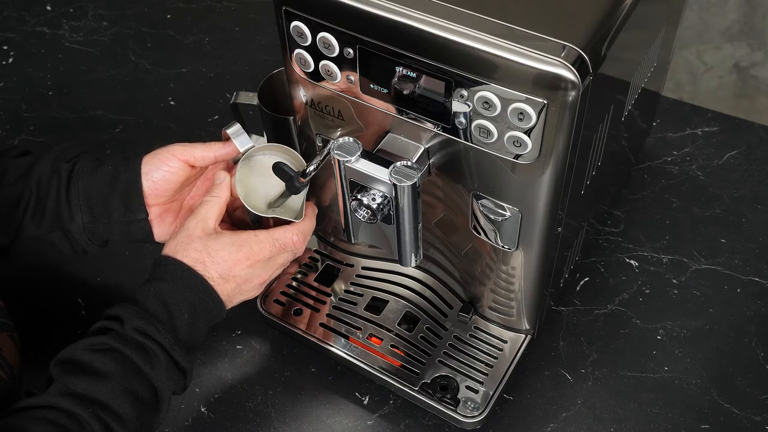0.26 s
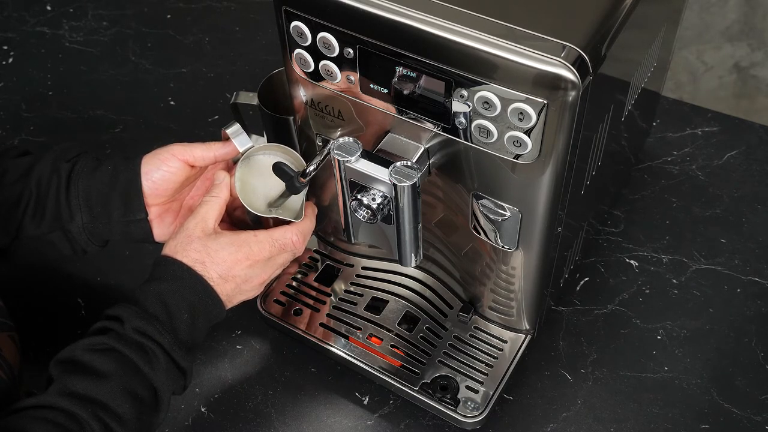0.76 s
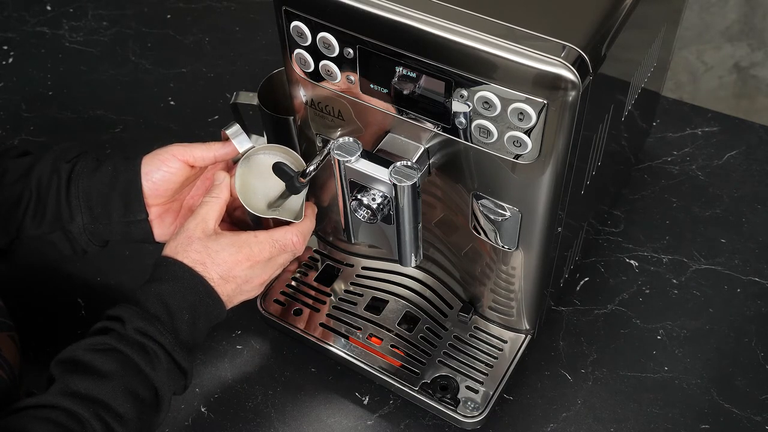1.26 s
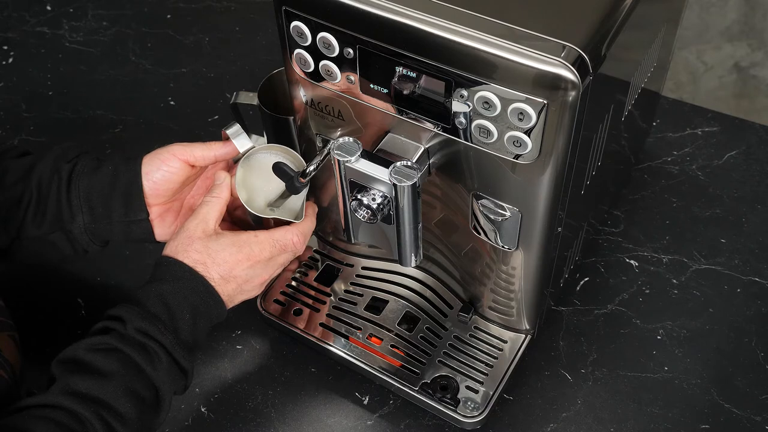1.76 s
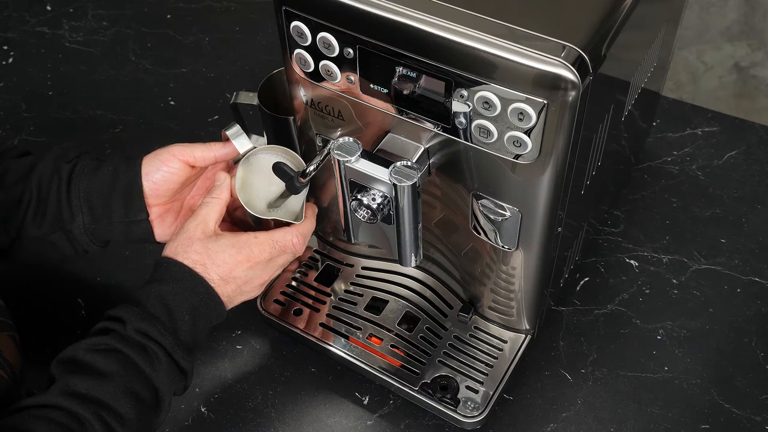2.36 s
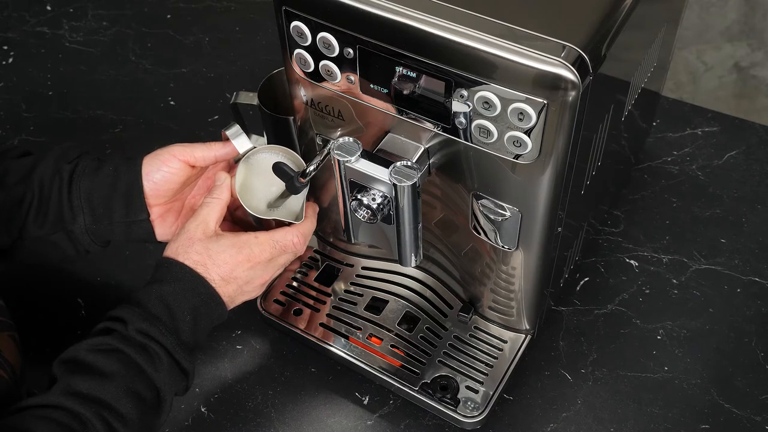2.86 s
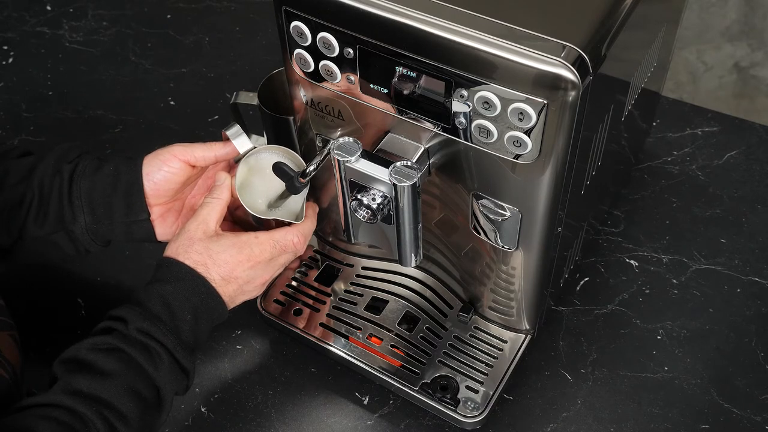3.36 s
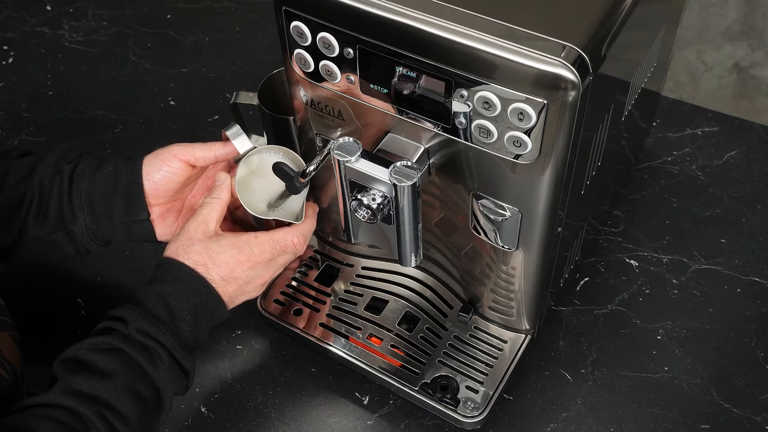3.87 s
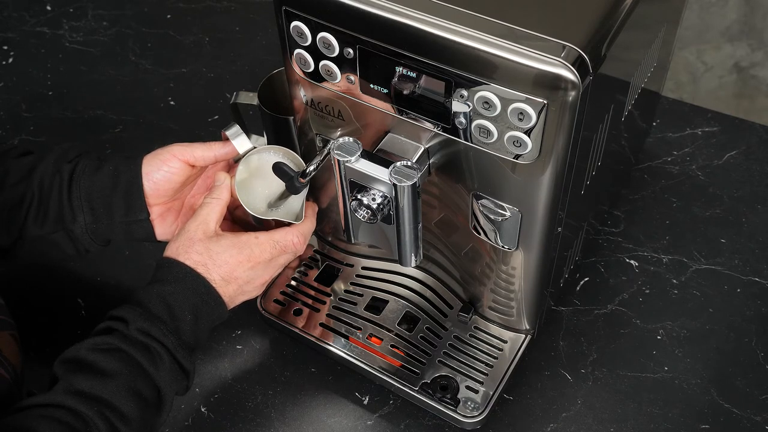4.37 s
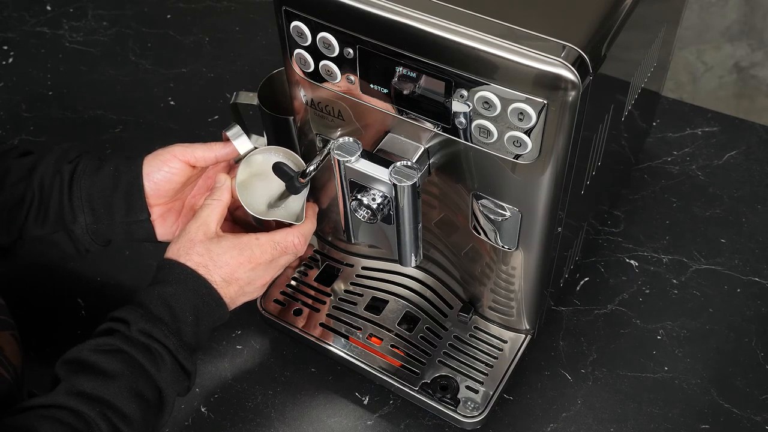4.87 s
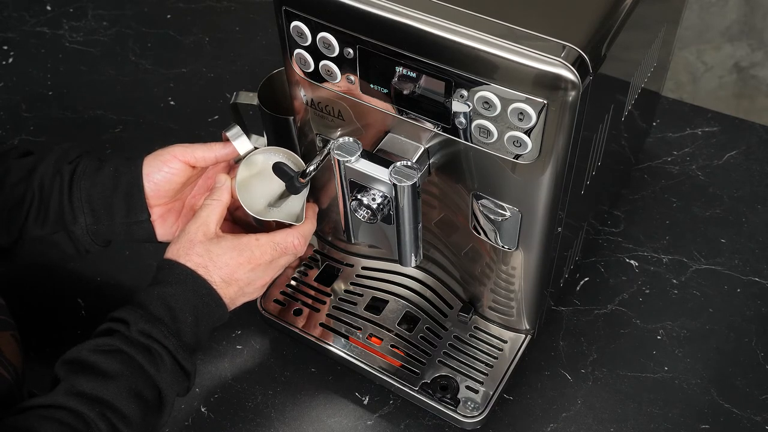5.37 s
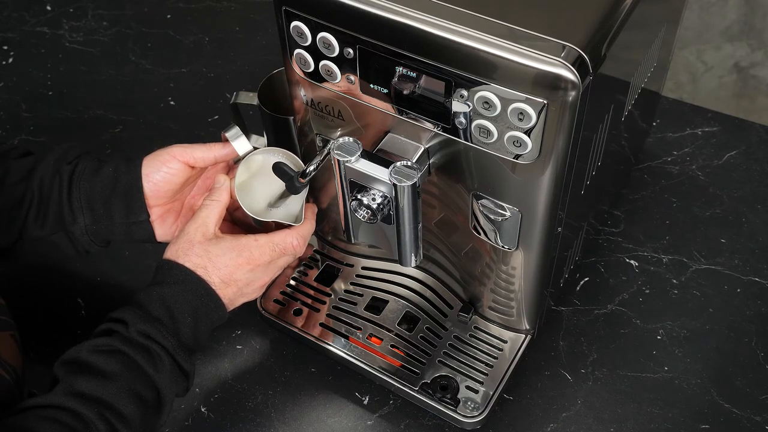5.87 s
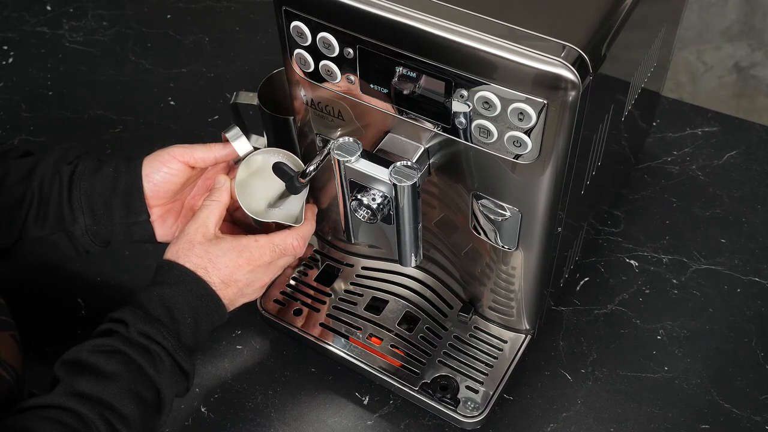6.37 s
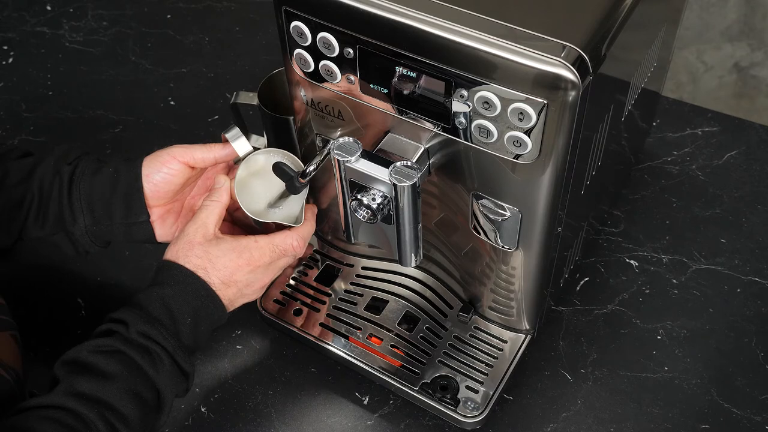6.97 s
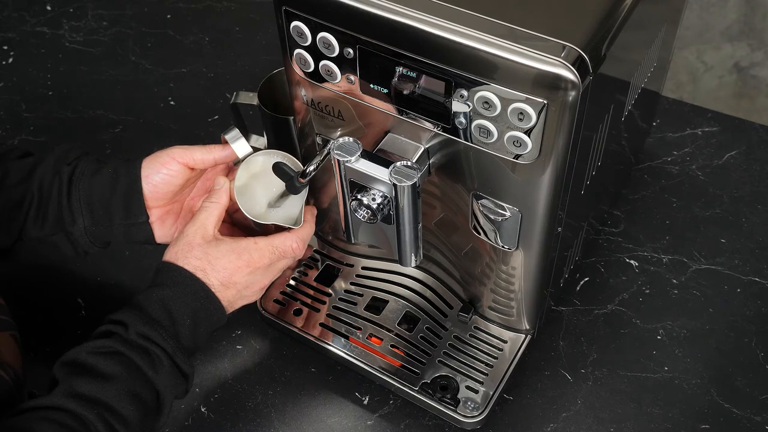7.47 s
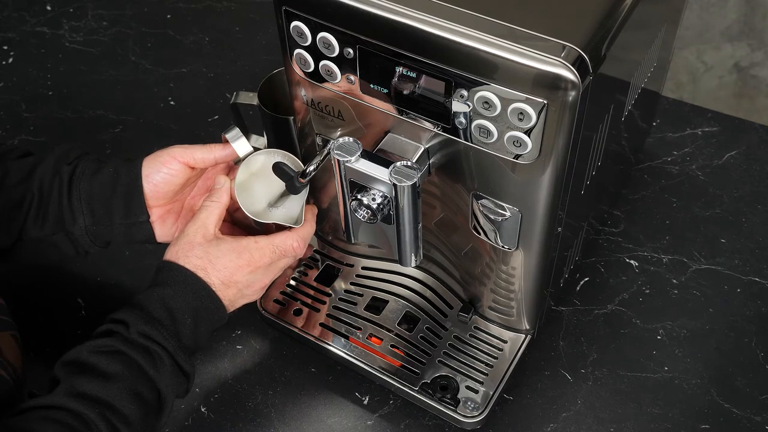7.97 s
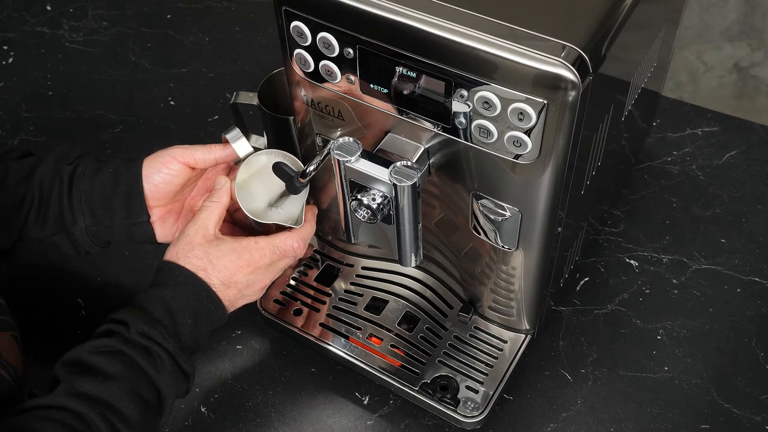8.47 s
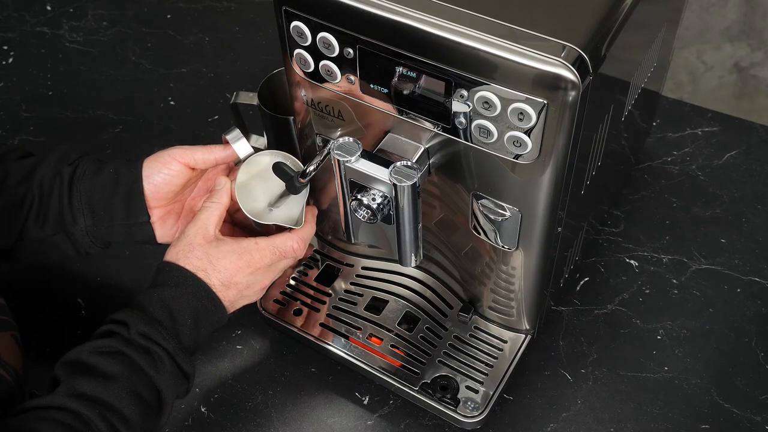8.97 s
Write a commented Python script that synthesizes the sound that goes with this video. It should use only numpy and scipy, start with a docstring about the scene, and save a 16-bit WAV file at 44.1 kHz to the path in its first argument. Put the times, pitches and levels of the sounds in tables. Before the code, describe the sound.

From 0 to about 9.2 seconds, close to the microphone in a quiet room, an even, bright steam hiss runs without pause. Under it, milk churns with a hollow, fluttering roar around 1 kHz in a small steel pitcher, and condensing bubbles rasp with a ringing crackle. Two spitting snaps come just after 0.1, with big-bubble bloops near 0.5 and 0.7. At 1.4-1.75 the tip breaks the surface in the strongest, shrill sputter, and the rasp thins. Further spurts follow near 2.3, with short sputters around 3.0-3.6 and a few bloops near 4.0-4.3. From 4.4 brief lower gurgles alternate with weaker sputters, while the remaining rasp becomes thinner and higher. Low puffs of escaping air rumble softly. After 8.3 a fine, high fizz of tiny pops rises, churning swells and the rasp fades. Throughout, a faint dull pump throbs roughly five times a second.

```python
"""Steam wand frothing milk

A coffee machine's steam wand froths milk in a small steel pitcher, close to the microphone. The jet is hissing
noise; collapsing bubbles are noise puffs that churn in the pitcher's hollow and rasp while the tip is deep.
When the tip breaks the surface, clumped puffs sputter and the rasp thins out. From about the middle, as foam
builds, the tip dips in for short gurgles; near the end a fizz of tiny pops joins. A pump of decaying sine
tones throbs almost evenly behind."""
import sys
import numpy as np
from scipy import signal
from scipy.fft import rfft, irfft, next_fast_len
from scipy.io import wavfile
from scipy.ndimage import uniform_filter1d, map_coordinates

SR = 44100
rng = np.random.default_rng(int(sys.argv[2]) if len(sys.argv) > 2 else 0)


def wrap_up_sound(samples):
    """Save the sound to the file named by the first command line argument, as 16-bit audio."""
    columns = np.atleast_2d(samples).T
    # keep every value between -1 and 1, then stretch to whole-number steps
    tamed = np.clip(columns, -1, 1)
    steps = np.round(tamed * 32767).astype(np.int16)
    wavfile.write(sys.argv[1], SR, steps)


N = 406602  # length in samples

# Quiet room and low air noise, relative spectra: (frequency [Hz], density [dB per Hz])
ROOM_TONE = [(20, 3.5), (100, -0.5), (160, -18.5), (350, -11), (600, -15.5), (2000, -12.5), (16000, -48)]
RUMBLE = [(10, -10), (24, 3), (45, -5.5), (92, -22), (160, -34), (300, -43)]
# Ringing of the pump's housing: (frequency [Hz], average relative level [dB], time to fall 60 dB [s])
HOUSING = [(206, -0.5, 0.18), (226.7, -5, 0.19), (259.2, -3.5, 0.22), (309, -3.5, 0.17), (365, 1.5, 0.11),
           (413.5, 3.5, 0.11), (493, -1.5, 0.2)]
# Steam hiss before the nozzle resonances, relative spectrum: (frequency [Hz], density [dB per Hz])
HISS = [(300, -46), (1500, -4), (3300, -0.5), (3950, 3.5), (4400, 2.5), (4650, 2), (5300, -3), (6900, 1.5),
        (8100, 3.5), (9200, 0.5), (10000, 4), (11600, 1.5), (12500, -22), (13400, -28), (15800, -19)]
# Resonances of the nozzle: (frequency [Hz], width [Hz], boost [dB])
NOZZLE = [(5610, 84, 10.5), (6390, 120, 8), (7480, 170, 11), (8220, 140, 8.5), (8740, 150, 7.5)]
# Fine fizz of the foam near the end: (time [s], level [dB])
FIZZ = [(8.3, -75), (8.55, -39), (9.22, -35.5)]
# Colour of the fizz, relative spectrum: (frequency [Hz], density [dB per Hz])
FOAM_FIZZ = [(4500, -54), (5300, -4), (5630, 2), (6000, -14), (8900, -35), (9600, -17), (12500, -7),
             (13600, -4), (14250, -21), (15600, 0)]
# Foam builds up: (time [s], share [0-1])
FOAM = [(0, 0), (5, 0.17), (7.3, 1), (9.22, 0.88)]
# The pitcher tilts and flattens the hollow's note: (time [s], share [0-1])
TILT = [(1.6, 0.07), (1.8, 0.93), (2.95, 0.94), (3.3, 0.12), (3.6, 0), (5.1, 0.1), (5.25, 0.87),
        (6.2, 0.62), (6.8, 0.33), (7.3, 0)]
# Churning milk, before its random flutter: (time [s], level [dB])
CHURN = [(0, -33), (.3, -33), (.73, -29.5), (1.2, -32.5), (1.7, -37), (1.85, -32.5), (3.5, -33.5),
         (4.9, -33.5), (5.02, -29.5), (5.15, -33.5), (6.4, -33.5), (7.45, -31.5), (7.75, -34), (8.4, -32),
         (9.22, -28.5)]
# The hollow with cold milk, warm milk and the pitcher tilted, relative spectra: (frequency [Hz], density [dB
# per Hz])
COLD_HOLLOW = [(350, -31), (480, -25.5), (590, -18), (700, -19.5), (815, -5.5), (950, 3), (1050, -3),
               (1180, -9.5), (1370, -4.5), (1460, -11.5), (1570, -29), (2000, -34.5)]
WARM_HOLLOW = [(350, -27.5), (470, -17), (570, -24.5), (740, -11.5), (860, -12.5), (1015, 3.5),
               (1200, -7.5), (1300, -5.5), (1430, -8), (1580, -27.5), (1710, -17), (2050, -41)]
TILTED_HOLLOW = [(350, -27), (480, -19), (610, -15.5), (720, -9), (820, 0.5), (920, -2), (1050, 1.5),
                 (1210, 2), (1340, -6), (1450, -9), (1580, -19.5), (2000, -36)]
# Big bubbles collapse: (time [s], peak of the swell [dB])
GULPS = [(.473, -16), (.668, -20), (1.826, -19.5), (2.761, -20), (3.907, -29), (4.012, -19), (4.317, -17.5),
         (5.926, -24), (7.738, -24), (8.15, -25.5)]
# Single spurts of spray: (time [s], strength that sets snap, thud and gust [dB])
SPURTS = [(.1033, -7.5), (0.1423, -11), (1.037, -16.5), (1.4358, -8), (1.566, -8), (2.215, -12.5),
          (2.3046, -8.5), (3.3338, -17), (3.3737, -20), (3.3915, -15), (4.242, -21), (4.81, -18.5),
          (5.8955, -15.5), (6.327, -20.5), (7.0675, -19), (8.228, -18)]
# Low thud of a spurt, relative spectrum: (frequency [Hz], density [dB per Hz])
THUD = [(20, 0), (70, -5), (150, -9), (400, -12), (700, -18), (1500, -40)]
# Hard and soft spray, relative spectra: (frequency [Hz], density [dB per Hz])
HARD_SPRAY = [(500, -20.5), (2000, -25), (4000, -18.5), (5300, -26.5), (7600, -16.5), (9150, -16.5),
              (9600, -10.5), (10400, -1.5), (10950, -9), (11500, 2), (12400, -6.5), (13000, -16),
              (13500, -9.5), (14300, -19), (15600, -10.5)]
SOFT_SPRAY = [(1500, -21), (5000, -37), (7000, -5), (9000, -8.5), (9700, 7.5), (10900, 5.5), (12000, 4.5),
              (13000, -1), (13500, -9), (14300, -4), (15600, -15)]
# The tip breaks the surface and sputters: (start [s], length [s], starting level [dB])
SPUTTERS = [(1.429, 0.32, -19), (2.314, .075, -26.5), (3.045, 0.092, -22), (3.178, 0.084, -24),
            (3.442, 0.014, -31), (3.555, 0.014, -24.5), (4.603, .045, -27.5), (4.998, 0.061, -33.5),
            (5.496, .1, -29), (6.106, .03, -26), (6.65, 0.073, -30.5), (6.853, 0.083, -24.5),
            (7.145, 0.071, -27.5), (7.39, 0.11, -40), (7.85, .06, -39.5)]
# Light spitting around the tip between the sputters: (time [s], level [dB])
SPITTING = [(0, -43), (.6, -52), (1.3, -41), (1.85, -54), (2.1, -42.5), (2.8, -48), (3.4, -33.5),
            (3.7, -47.5), (3.95, -41.5), (4.9, -39), (5.4, -45.5), (5.7, -37), (6.0, -43.5), (6.55, -38),
            (7.3, -45), (8.05, -48.5), (8.6, -39.5), (9.22, -35)]
# Steam condenses under the milk, before venting, gurgles and slosh: (time [s], level [dB], bubble ring [Hz])
RASP = [(0, -34.5, 2520), (.42, -32, 2420), (.6, -33.5, 2270), (1.02, -34, 2040), (1.2, -33, 2500),
        (1.9, -31.5, 2550), (2.15, -36.5, 2520), (2.92, -33.5, 2550), (3.3, -39, 2825), (3.68, -34.5, 2680),
        (3.95, -39, 2610), (4.15, -35.5, 2620), (4.38, -40, 3155), (5.0, -45, 3410), (5.7, -40.5, 3500),
        (6.6, -42.5, 3830), (8.3, -40, 3840), (9.22, -57, 3750)]
# The tip dips in and gurgles, before slosh: (start [s], length [s], level [dB], bubble ring [Hz])
GURGLES = [(4.433, 0.094, -37.5, 2750), (4.674, 0.12, -42, 2740), (5.25, 0.22, -36.5, 2800),
           (5.976, 0.094, -37.5, 2500), (6.202, 0.2, -37, 2500), (6.51, .05, -40.5, 2680),
           (6.79, .025, -38.5, 2950), (6.974, 0.053, -39, 2550), (7.345, .02, -36, 2620),
           (7.535, 0.033, -37.5, 2600), (8.004, 0.16, -36.5, 2910), (8.43, .015, -39, 2950),
           (8.809, .01, -39, 3150)]
# Air modes of the pitcher, before they are sharpened: (frequency [Hz], width [Hz], relative level [dB])
PITCHER = [(1676, 174, 6.5), (1887, 85, 5.5), (2098, 39, 5), (2136, 45, 7.5), (2234, 30, 5.5),
           (2390, 47, 6), (2458, 53, 5.5), (2680, 145, 6.5), (2816, 22, 6.5), (2965, 45, -7.5),
           (3076, 65, 7.5), (3156, 44, 4), (3380, 45, 5.5), (3720, 110, -0.5), (3920, 175, 5),
           (4136, 370, 5.5)]

JET_DB = -38
SPUTTER_ATTACK_S, SPUTTER_RELEASE_S, SPUTTER_SAG_DB_PER_S = 0.035, 0.013, 12
GURGLE_ATTACK_S, GURGLE_RELEASE_S = 0.057, 0.034
# The thin rasp left while steam escapes, and the sputter level that lets half of the steam out
VENTED_DB, VENTED_HZ, VENTING_DB = -45.5, 3730, -28.5
VENTING_SMOOTH_S = 0.02  # time the rasp takes to thin out or return
# Thud strength of the strongest spurt; weaker spurts lose their thud faster than their snap
THUD_DB, THUD_GROWS = -30, 1.6
SPURT_GUST_DB, SPURT_GUST_T60_S = -29, 0.3  # draught after a spurt, relative to the spurt
TOP_HZ = 15830


def amp(db):
    """Turn decibels into gain."""
    return 10 ** (np.asarray(db) / 20)


def unit(x):
    """Scale x to an average strength (rms) of 1."""
    return x / np.sqrt(np.mean(x ** 2) + 1e-20)


def seconds():
    """Give the time of every sample."""
    return np.arange(N) / SR


def curve(rows):
    """Join (time, value) rows with straight lines, one value per sample."""
    return np.interp(seconds(), *np.transpose(rows))


def shape(points):
    """Make a gain for any frequency from (Hz, dB) points, joined along a log axis."""
    f, db = np.transpose(points)
    return lambda hz: amp(np.interp(np.log(hz + 1), np.log(f + 1), db))


def humps(modes, hz):
    """Join the gains of (Hz, width, dB) resonances by adding their power."""
    power = sum(
        amp(db) ** 2 / (1 + (2 * (hz - centre) / width) ** 2)
        for centre, width, db in modes)
    return np.sqrt(power)


def wobble(rate):
    """Draw a smooth random curve with this many random points a second."""
    coarse = seconds()[::64]
    points = rng.standard_normal(len(coarse))
    return np.interp(seconds(), coarse, map_coordinates(points, [coarse * rate]))


def coloured(x, gain, size=16384):
    """Filter x to this gain against frequency, without any sound ahead of its cause."""
    wanted = np.maximum(gain(np.fft.rfftfreq(size, 1 / SR)), 1e-6)
    # folding the cepstrum puts the filter's energy as early as possible
    cepstrum = irfft(np.log(wanted))
    cepstrum[1:size // 2] *= 2
    cepstrum[size // 2 + 1:] = 0
    response = irfft(np.exp(rfft(cepstrum)))[:size // 2]
    return signal.oaconvolve(x, response)[:N]


def impulses(times, sizes):
    """Place kicks of these sizes at these times."""
    places = np.clip(np.asarray(times) * SR, 0, N - 1).astype(int)
    return np.bincount(places, sizes, N)


def pops(rate, spread_db, count=60000):
    """Scatter kicks of uneven size at random times, rate a second."""
    times = rng.random(count) * N / SR
    sizes = amp(spread_db * np.clip(rng.standard_normal(count), -2, 2))
    used = int(rate * N / SR)
    return impulses(times[:used], sizes[:used])


def fading_power(kicks, t60):
    """Let the power of every kick die away, 60 dB in t60 seconds."""
    return signal.lfilter([1], [1, -amp(-120 / (t60 * SR))], kicks ** 2)


def puffs(kicks, t60, rise=0.00049):
    """Let every kick release a short, fading puff of noise with a soft start; times in seconds."""
    power = fading_power(kicks, t60)
    power = signal.lfilter([1 / (rise * SR)], [1, -np.exp(-1 / (rise * SR))], power)
    return np.sqrt(power) * rng.standard_normal(N)


def event_gain(start, length, attack, release, sag_db_per_s=0):
    """Fade one event in ahead of its start, hold it while it sags, then fade it out; times in seconds."""
    t = seconds() - start
    gate = np.interp(t, [-attack, 0, length, length + release], [0, 1, 1, 0])
    return gate * amp(-sag_db_per_s * np.clip(t, 0, length))


def air(spit, rest_db=-56, gust_db=-39.0, gust_grows=0.57, foam_db=4):
    """Steam that escapes the milk puffs on the microphone, more as foam builds, over a quiet room."""
    loudest_sputter_db = np.max(SPUTTERS, axis=0)[2]
    escaping = gust_grows * (spit - loudest_sputter_db) + foam_db * curve(FOAM)
    s, db = np.transpose(SPURTS)
    gust_power = fading_power(impulses(s, amp(db + SPURT_GUST_DB)), SPURT_GUST_T60_S)
    draught = np.sqrt(amp(rest_db) ** 2 + amp(gust_db + escaping) ** 2 + gust_power)
    rumble = unit(coloured(rng.standard_normal(N), shape(RUMBLE)))
    rumble = rumble * draught * amp(2.5 * wobble(12))
    room = unit(coloured(rng.standard_normal(N), shape(ROOM_TONE))) * amp(-58.5)
    return rumble + room


def pump(first=0.118, period=0.183, swell=0.045, scatter=0.00278):
    """Each soft stroke of the water pump swells and rings in the machine's housing; settings in seconds."""
    out = np.zeros(N + SR)
    t = np.arange(SR // 3) / SR
    for s in np.arange(first, N / SR, period):
        ring = np.zeros(len(t))
        for hz, db, t60 in HOUSING:
            fade = amp(db + rng.normal(0, 2.4) - 60 * t / t60)
            ring += fade * np.sin(2 * np.pi * (hz * t + rng.random()))
        begin = round(abs(s + rng.normal(0, scatter)) * SR)
        out[begin:][:len(t)] += ring * (1 - np.exp(-t / swell)) ** 2
    return unit(out[:N]) * amp(-58.5)


def fizz():
    """Countless tiny foam bubbles burst as short noise puffs and make a sizzle."""
    bursts = puffs(pops(rate=1400, spread_db=7.0), t60=0.0033)
    return unit(coloured(bursts, shape(FOAM_FIZZ))) * amp(curve(FIZZ))


def gulps(pitch_hz=990, swell=0.0017):
    """A big bubble collapses: a few cycles near the hollow's note swell (seconds) and fade."""
    out = np.zeros(N + SR)
    t = np.arange(SR // 30) / SR
    envelope = t / swell * np.exp(1 - t / swell)
    for s, db in GULPS:
        hz = pitch_hz * (1 + 0.053 * rng.standard_normal())
        out[round(s * SR):][:len(t)] += amp(db) * np.sin(2 * np.pi * hz * t) * envelope
    return out[:N]


def churn():
    """Collapsing bubbles knock on the hollow above the milk, whose colour shifts with foam and the pitcher's
    tilt."""
    knocks = pops(rate=2200, spread_db=2.5)
    tilt, foam = curve(TILT), curve(FOAM)
    states = [
        (COLD_HOLLOW, (1 - tilt) * (1 - foam)),
        (WARM_HOLLOW, (1 - tilt) * foam),
        (TILTED_HOLLOW, tilt)]
    roar = np.zeros(N)
    for hollow, share in states:
        # the shares split the power, so each gain is a square root
        roar += np.sqrt(share) * unit(coloured(puffs(knocks, t60=0.0045), shape(hollow)))
    return roar * amp(curve(CHURN) + 1.2 * wobble(45))


def spurts():
    """A pocket of steam breaks out: a snap of spray and a low thud, both puffs of noise."""
    s, db = np.transpose(SPURTS)
    snaps = puffs(impulses(s, amp(db)), t60=0.022, rise=0.0015)
    thud_sizes = amp(THUD_DB + THUD_GROWS * (db - db.max()))
    thuds = puffs(impulses(s, thud_sizes), t60=0.026)
    # colouring keeps the overall strength of the puffs
    snap = unit(coloured(snaps, shape(HARD_SPRAY))) * np.std(snaps) * amp(-4)
    thud = unit(coloured(thuds, shape(THUD))) * np.std(thuds)
    return snap + thud


def sputtering():
    """The tip breaks the surface again and again: add up the gain of these sputters."""
    return sum(
        amp(db) * event_gain(s, length, SPUTTER_ATTACK_S, SPUTTER_RELEASE_S, SPUTTER_SAG_DB_PER_S)
        for s, length, db in SPUTTERS)


def spray(level, hard_db=-25, blend_db=5.5, most_hard=0.89, shrill_db=0.7, soft_db=0.5):
    """Milk tears into droplets at the tip: clumps of tiny spits, denser and shriller when it sputters hard."""
    hard = most_hard / (1 + np.exp((hard_db - level) / blend_db))
    tearing = puffs(pops(rate=1300, spread_db=3.8), t60=0.003, rise=0.0002)
    spitting = puffs(pops(rate=1100, spread_db=3.8), t60=0.004, rise=0.0003)
    # weak spitting comes in separate clumps, which run together as it grows
    clumps = amp(11.0 * (1 - hard) ** 2 * np.tanh(wobble(65)))
    shrill = unit(coloured(tearing, shape(HARD_SPRAY))) * amp(level + shrill_db)
    soft = unit(coloured(spitting * clumps, shape(SOFT_SPRAY))) * amp(level + soft_db)
    return np.sqrt(hard) * shrill + np.sqrt(1 - hard) * soft


def condensing(sputter, slosh_db=0.5, slosh_octaves=0.032):
    """Give the rasp's level (dB) and ring (Hz): venting pulls it to a thin rasp, gurgles to their own."""
    s, db, hz = np.transpose(RASP)
    level, ring = np.interp(seconds(), s, db), np.interp(seconds(), s, hz)
    vented = sputter ** 2 / (sputter ** 2 + amp(VENTING_DB) ** 2)
    vented = uniform_filter1d(vented, int(VENTING_SMOOTH_S * SR))
    level = level + vented * (VENTED_DB - level)
    ring = ring + vented * (VENTED_HZ - ring)
    for start, length, gurgle_db, gurgle_hz in GURGLES:
        dip = event_gain(start, length, GURGLE_ATTACK_S, GURGLE_RELEASE_S)
        level = level + dip * (gurgle_db - level)
        ring = ring + dip * (gurgle_hz - ring)
    # the milk sloshes over the tip: deeper is louder and lower
    slosh = wobble(22)
    return level + slosh_db * slosh, ring * 2 ** (-slosh_octaves * slosh)


def rasp(level, ring_hz, width_octaves=0.33, widening=0.031, narrowing=0.25):
    """Small bubbles condense under the milk; their shifting ring picks out the pitcher's modes."""
    crackle = puffs(pops(rate=6000, spread_db=2.2), t60=0.002)
    hz, t, spectrum = signal.stft(crackle, SR, nperseg=256)
    centre = np.interp(t, seconds(), ring_hz * 2 ** (0.08 * wobble(28)))
    # stronger condensation makes a wider range of bubble sizes; foam evens them out
    spread = widening * (level - level.mean()) - narrowing * curve(FOAM)
    width = width_octaves * np.exp(np.interp(t, seconds(), spread))
    octaves_off = np.log2((hz[:, None] + 1) / centre)
    bell = np.exp(-0.5 * (octaves_off / width) ** 2) + 0.1
    bell = bell / np.linalg.norm(bell, axis=0)
    ring = signal.istft(spectrum * bell, SR, nperseg=256)[1][:N]
    flutter = 1.2 * wobble(38)
    # the power of 1.45 sharpens the pitcher's modes
    in_pitcher = coloured(ring, lambda hz: humps(PITCHER, hz) ** 1.45)
    return unit(in_pitcher) * amp(level + flutter)


def nozzle(hz):
    """Resonances of the nozzle lift the hiss around their frequencies; their boosts add up in dB."""
    return amp(sum(db / (1 + (2 * (hz - centre) / width) ** 2) for centre, width, db in NOZZLE))


def jet():
    """Steam rushes evenly through the nozzle: coloured noise with a slight flutter."""
    hiss = coloured(rng.standard_normal(N), lambda hz: shape(HISS)(hz) * nozzle(hz))
    return unit(hiss) * amp(JET_DB + 1.4 * wobble(14))


def scene(uneven_db=1.4):
    """Mix all sources; each sputter drives the spray and the draught, and starves the rasp."""
    sputter = sputtering()
    spit = 20 * np.log10(np.hypot(sputter, amp(curve(SPITTING)))) + uneven_db * wobble(25)
    background = air(spit) + pump()
    milk = fizz() + gulps() + churn() + spurts() + spray(spit)
    steam = rasp(*condensing(sputter)) + jet()
    return (background + milk + steam)[None]


def record(dry):
    """Remove everything above the band limit."""
    size = next_fast_len(N + SR // 2)
    kept = np.fft.rfftfreq(size, 1 / SR) < TOP_HZ
    return irfft(rfft(dry, size) * kept, size)[..., :N]


dry = scene()
out = record(dry)
wrap_up_sound(out)
```